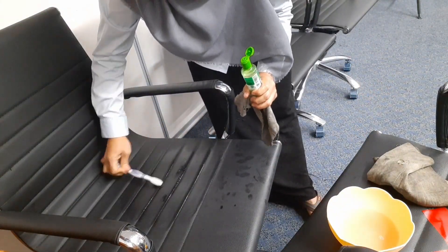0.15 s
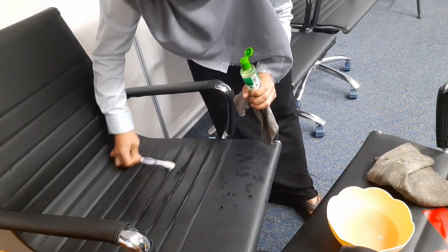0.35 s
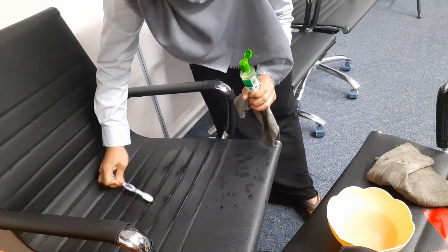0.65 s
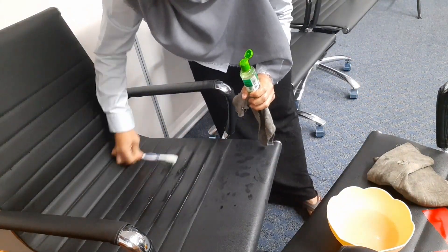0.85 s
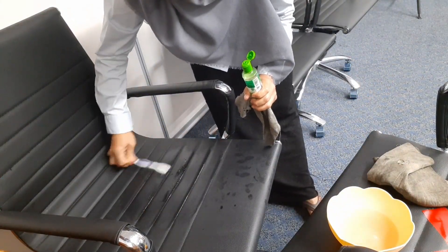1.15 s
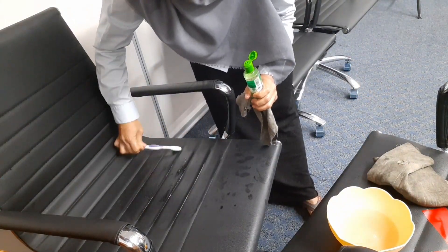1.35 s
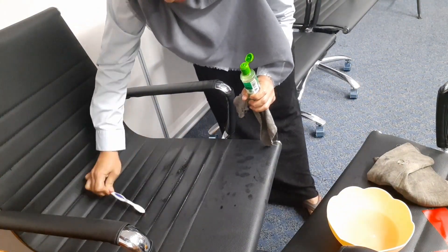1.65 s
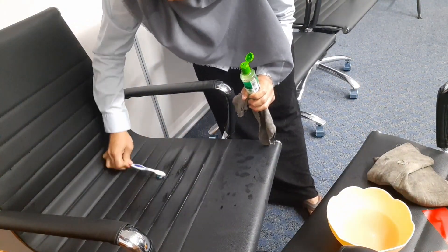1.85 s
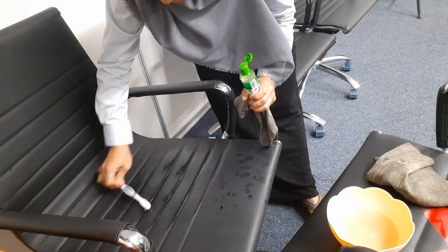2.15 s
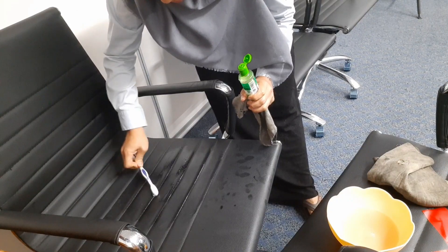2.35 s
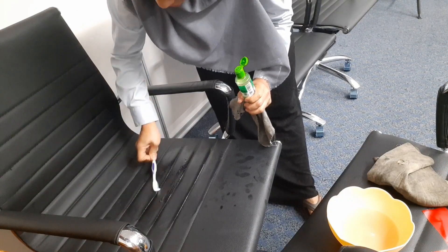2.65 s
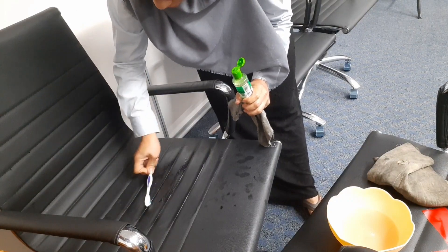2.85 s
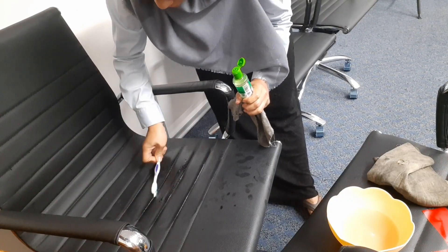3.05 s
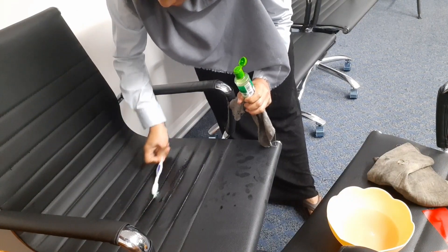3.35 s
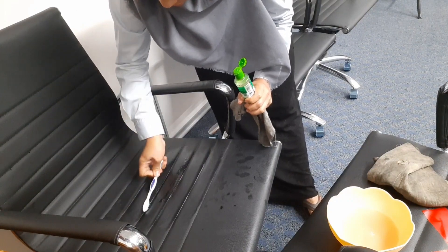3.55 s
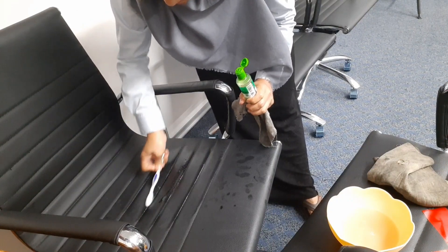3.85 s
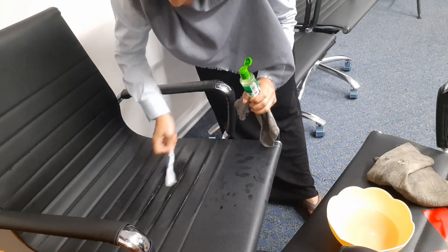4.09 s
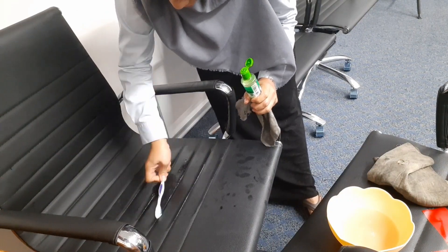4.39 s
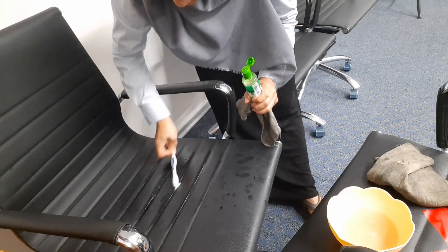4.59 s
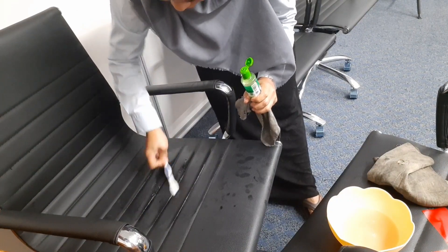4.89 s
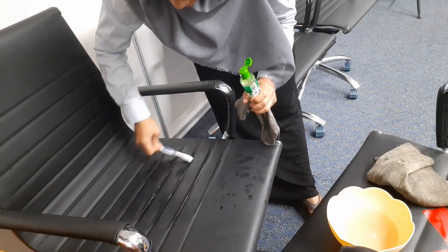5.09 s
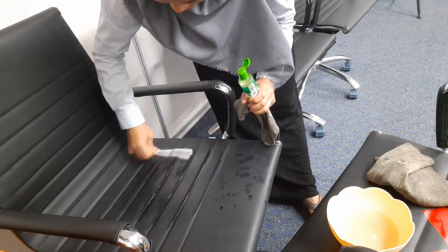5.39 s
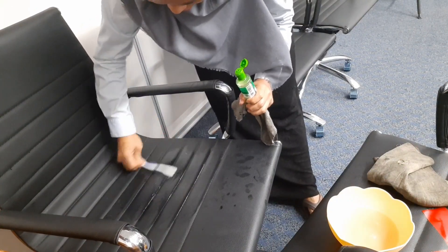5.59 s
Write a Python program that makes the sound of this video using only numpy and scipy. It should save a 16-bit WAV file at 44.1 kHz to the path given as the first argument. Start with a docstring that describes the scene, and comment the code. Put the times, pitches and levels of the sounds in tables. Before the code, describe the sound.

Quick, even toothbrush strokes fizz and swish over wet leather close by, while the padded seat gives dull bumps in a quiet office.

```python
"""A toothbrush scrubs a wet leather chair seat in a carpeted office, about five strokes a second.
From the start, bristles fizz, the wet film swishes and the leather judders over a faint room rumble.
Near 2.5 s the swish rings lower and the padded seat booms more often as the hand pushes into it.
After 4 s the swish climbs again and the booms peak; just before the end the brush lands with its
sharpest tick. A phone close by hears it all, with short reflections off the chair and the room."""
import sys
import numpy as np
from scipy import signal
from scipy.fft import rfft, irfft, next_fast_len
from scipy.io import wavfile
from scipy.ndimage import uniform_filter1d

SR = 44100
rng = np.random.default_rng(int(sys.argv[2]) if len(sys.argv) > 2 else 0)


def dump(signal):
    """Clip the signal to [-1, 1] and save it as 16-bit WAV at the path in sys.argv[1]."""
    limited = np.clip(np.atleast_2d(signal).T, -1, 1)
    pcm = np.round(limited * 32767).astype(np.int16)
    wavfile.write(sys.argv[1], SR, pcm)


N = 252693
T = np.arange(N) / SR
SIZE = next_fast_len(N + SR // 4)  # leaves space for the room's tail
F = np.fft.rfftfreq(SIZE, 1 / SR)

# strokes, to and fro: start t/s, length/s, fastest point and hardest drag (both 0-1 of the stroke),
# then a relative level/dB each for bristles, swish, leather and frame
BRUSH_STROKES = [(-0.072, 0.21, 0.13, 0.14, -47, -53.5, -63.5, -61.5),
                 (0.155, 0.11, 0.27, 0.3, -57, -73, -75.5, -72),
                 (0.319, 0.19, 0.27, 0.32, -45, -52.5, -55.0, -58),
                 (0.492, 0.23, 0.58, 0.4, -48, -56.5, -71.5, -69),
                 (0.744, 0.24, 0.55, 0.43, -44.0, -52, -59.5, -61.5),
                 (0.997, 0.15, 0.76, 0.71, -49, -58, -83, -80),
                 (1.172, 0.17, 0.49, 0.43, -46, -53.5, -62.5, -63),
                 (1.382, 0.3, 0.57, 0.66, -44, -51.5, -73, -72),
                 (1.71, 0.24, 0.51, 0.83, -47.5, -55, -67.5, -61.5),
                 (1.95, 0.21, 0.54, 0.61, -47.5, -58.5, -66, -67.5),
                 (2.204, 0.18, 0.45, 0.47, -52.5, -59, -67, -64.5),
                 (2.374, 0.15, 0.49, 0.15, -58, -69, -70.5, -58.5),
                 (2.533, 0.179, 0.63, 0.64, -51.5, -57.5, -54.5, -58),
                 (2.695, 0.21, 0.55, 0.34, -57.0, -71, -67, -64),
                 (2.903, 0.17, 0.71, 0.86, -50.5, -60.5, -57.5, -57.5),
                 (3.063, 0.19, 0.58, 0.54, -52, -66, -65.0, -60),
                 (3.273, 0.17, 0.55, 0.64, -53.5, -61.5, -60.5, -63),
                 (3.403, 0.22, 0.53, 0.53, -53, -60, -60.5, -64),
                 (3.614, 0.17, 0.77, 0.68, -47, -55.5, -56.5, -56.5),
                 (3.774, 0.213, 0.38, 0.44, -51.5, -62.5, -62, -57.5),
                 (3.968, 0.16, 0.67, 0.62, -49.5, -60.5, -61.5, -63),
                 (4.205, 0.23, 0.6, 0.68, -53.5, -63, -65.5, -63.5),
                 (4.451, 0.21, 0.68, 0.54, -44.5, -51.0, -51.5, -55),
                 (4.656, 0.19, 0.48, 0.21, -48.5, -58.0, -59.5, -57.5),
                 (4.836, 0.266, 0.59, 0.48, -43, -49, -53.0, -53),
                 (5.126, 0.12, 0.53, 0.6, -49.5, -61.5, -71.5, -63),
                 (5.238, 0.19, 0.45, 0.4, -47.5, -58, -69.5, -65),
                 (5.422, 0.18, 0.38, 0.48, -45.5, -53.0, -64, -55),
                 (5.589, 0.185, 0.46, 0.74, -45.5, -53, -61.5, -61.5)]
# tone of the flicking bristles: f/Hz, level/dB
BRISTLE_TONE = [(1500, -22), (3000, -17.5), (4200, -13), (6200, -4.5), (7000, -3), (7900, -2), (8600, 2),
                (10000, 0), (12200, -0.5), (14000, -2.5), (15800, -6.5)]
# tone of the wet film: f/Hz, level/dB
SWISH_TONE = [(600, -10.5), (950, -23), (1200, -6), (1650, 0), (2100, -3), (2700, -1), (3250, -3),
              (4000, -0.5), (6000, -6), (10000, -24)]
# the hollow under the brush rings high across the seat's ribs, low along them: t/s, f/Hz
HOLLOW_PITCH = [(0, 1560), (2.35, 1586), (2.5, 1047), (4.1, 1073), (4.8, 1421), (5.3, 1720), (5.73, 1727)]
# tone of the brush head dragging on leather: f/Hz, level/dB
DRAG_TONE = [(90, -5), (170, -2), (270, -2), (400, -2), (560, -4.5), (720, -5.5), (1000, -10.5),
             (1400, -11), (2500, -28)]
# ringing notes of the stretched leather cover: f/Hz, width/Hz, level/dB
COVER_NOTES = [(334, 11, -1), (368.7, 24, -1.5), (439.5, 87, -9.5), (526, 23.6, -3), (609.4, 62, -15.5)]
# ringing notes of the seat's frame: f/Hz, width/Hz, level/dB
FRAME_NOTES = [(169, 47, -7.5), (204.3, 19, -0.5), (235, 22.5, -3), (264.7, 26.3, -4.5)]
# ringing notes of the cushion: f/Hz, width/Hz, level/dB
CUSHION_NOTES = [(55, 40, -22), (96.09, 6.25, 2.5), (119.1, 13.4, -7)]
# the arm's weight keeps the cushion rumbling: t/s, relative level/dB
ARM_WEIGHT = [(0, -67.5), (2.3, -65), (3, -56.5), (4.3, -50.5), (5.73, -57.5)]
# echoes off hand, armrest and backrest: delay/s, change of delay over a stroke/s, level/dB
CLOSE_ECHOES = [(.00045, .0001, -9.5), (.0014, 0.0044, -13), (.0032, 0.0046, -8.5), (.0061, -0.0037, -9)]
# tone of the ventilation: f/Hz, level/dB
VENT_TONE = [(25, -22), (60, 16.5), (80, -7.5), (130, 4.5), (200, 4), (270, -6.5), (400, -23), (800, -21.5),
             (2000, -25.5), (6000, -30.5), (15000, -23)]
# the brush lands or flips its bristles over: t/s, relative tick level/dB, relative thump level/dB
BRUSH_LANDINGS = [(0.156, -59, -80), (0.326, -54.5, -60), (0.518, -56, -72), (0.775, -47, -62),
                  (1.037, -55, -73), (1.196, -49, -70), (1.737, -70, -70), (1.99, -59, -65),
                  (2.57, -65.5, -66), (3.843, -58, -62), (5.448, -41.5, -43)]
# the frame groans as a stroke loads it: peak t/s, length/s, level/dB
FRAME_GROANS = [(.355, 0.042, -52), (.87, .06, -58), (1.92, 0.072, -59), (3.41, 0.037, -52),
                (4.52, .06, -51)]
# the seat gives under a push and booms: peak t/s, length/s, relative level/dB
SEAT_PUSHES = [(0.38, 0.13, -51), (0.859, 0.16, -55), (2.43, 0.072, -53.5), (2.606, 0.13, -51),
               (2.8, 0.07, -56), (2.922, 0.13, -48.5), (3.042, 0.18, -46), (3.38, 0.12, -48),
               (3.551, 0.094, -47), (3.7, 0.11, -47.5), (3.77, 0.13, -43), (3.868, 0.05, -43.5),
               (4.076, 0.092, -49), (4.191, 0.08, -46.5), (4.302, 0.11, -39.5), (4.412, 0.058, -40.5),
               (4.654, 0.17, -45.5), (4.728, 0.13, -45), (4.88, 0.15, -45), (5.055, 0.12, -45),
               (5.193, 0.05, -45), (5.333, 0.05, -51), (5.467, 0.05, -49), (5.539, 0.13, -49.5),
               (5.69, 0.079, -44)]
# the brush digs in and the hollow rings out: peak t/s, length/s, level/dB
BRUSH_DIGS = [(2.09, 0.11, -57.5), (2.66, 0.071, -54), (3.04, 0.061, -63), (3.37, 0.11, -62.5),
              (4.08, 0.11, -61.5), (4.6, .12, -57.5)]


def undb(db):
    """Turn decibels into a number to multiply by."""
    return np.exp(np.asarray(db) * (np.log(10) / 20))


def unit(x):
    """Scale a signal to an average power of 1."""
    return x / np.sqrt(np.mean(x ** 2))


def curve(rows):
    """Join (time, value) points with straight lines."""
    return np.interp(T, *np.transpose(rows))


def colour(x, tone):
    """Make the lows and highs of x stronger or weaker, following a tone table."""
    hz, db = np.transpose(tone)
    gain = undb(np.interp(np.log(F + 1), np.log(hz), db))
    return unit(irfft(rfft(x, SIZE) * gain, SIZE)[:N])


def resonate(x, notes):
    """Let x ring a set of notes, added with alternating signs; narrow notes ring longer."""
    return unit(sum((-1) ** k * undb(db) * signal.lfilter(*signal.iirpeak(hz, hz / width, fs=SR), x)
                    for k, (hz, width, db) in enumerate(notes)))


def glide(x, hz, width_hz):
    """Each click of x rings briefly at a pitch that can move."""
    ring = signal.sosfilt(signal.butter(2, width_hz / 2, fs=SR, output="sos"), x)
    return unit(ring * np.cos(2 * np.pi * np.cumsum(hz) / SR))


def wander(rate):
    """A random drift that takes a new direction rate times a second."""
    points = rng.standard_normal(N // 10)
    return unit(np.interp(T * rate, np.arange(len(points)), points))


def slips(rate, spread_db):
    """Tiny random clicks of uneven size as something lets go, about rate a second."""
    share = np.clip(rate / SR, 1e-4, 1)
    chance = rng.uniform(-1, 1, N)
    size = undb(spread_db * rng.standard_normal(N)) * np.sign(chance)
    return unit((np.abs(chance) < share) * size / np.sqrt(share))  # equally strong at any rate


def steady(x, span_s):
    """Even out random swells slower than span_s, as under a firm hand."""
    return x / np.sqrt(uniform_filter1d(x * x, int(span_s * SR)) + 1e-4)


def stroke_level(peaks, levels_db, steepness, rest_db):
    """Level in dB that rises and falls with each stroke; rest_db still rubs as the brush turns round."""
    power = np.ones(N) * undb(rest_db) ** 2
    for (start, length, *_), peak, db in zip(BRUSH_STROKES, peaks, levels_db):
        span = slice(*np.searchsorted(T, [start, start + length]))
        progress = np.clip((T[span] - start) / length, 0, 1)
        arch = (progress / peak) ** peak * ((1 - progress) / (1 - peak)) ** (1 - peak)
        power[span] += (undb(db) * arch ** steepness) ** 2
    return 10 * np.log10(power)


def swells(rows, base_db):
    """Level in dB of bell-shaped swells on top of a base level."""
    power = np.ones(N) * undb(base_db) ** 2
    for s, length, db in rows:
        span = slice(*np.searchsorted(T, [s - length, s + length]))
        bell = np.exp(-8 * ((T[span] - s) / length) ** 2)
        power[span] += (undb(db) * bell) ** 2
    return 10 * np.log10(power)


def bristles(level_db, speed, lightness):
    """Bristles flick free, more of them on a fast stroke; a light hand brings out the bright tips."""
    flicks = slips(4000 + 24000 * speed, spread_db=0.5)
    tips = glide(flicks, np.full(N, 12300.), width_hz=5800)
    share = undb(-1.5) * lightness
    fizz = (colour(flicks, BRISTLE_TONE) + share * tips) / np.sqrt(1 + share ** 2)
    return fizz * undb(level_db + 3.0)


def wet_film(level_db, ring_db, speed):
    """The bristles wipe through the film of cleaner, which rings the hollow under the brush."""
    hollow = glide(slips(900 + 4000 * speed, spread_db=3), curve(HOLLOW_PITCH), width_hz=750)
    film = colour(slips(1500 + 7000 * speed, spread_db=2), SWISH_TONE)
    return film * undb(level_db + 0.28) + hollow * undb(ring_db)


def leather(level_db, speed):
    """The brush head sticks and slips: the cover rings, and its grain rasps higher at speed."""
    judder = colour(slips(1000, spread_db=-0.5), DRAG_TONE)
    ring = resonate(slips(600, spread_db=4.0), COVER_NOTES)
    rasp = glide(slips(700, spread_db=2.0), 120 + 1400 * speed, width_hz=550)
    rub = unit(judder + undb(2) * ring + undb(-1.0) * speed * rasp)
    return steady(rub, span_s=0.073) * undb(level_db - 0.1)


def seat(level_db, notes, span_s):
    """The rubbing shakes a part of the seat, frame or cushion, so that it rings."""
    ring = resonate(slips(1500, spread_db=2.5), notes)
    return steady(ring, span_s) * undb(level_db)


def brush_place():
    """The brush goes to and fro while the hand wanders over the seat."""
    turns = [start for start, *_ in BRUSH_STROKES] + [T[-1]]
    strokes_done = np.interp(T, turns, np.arange(len(turns)))
    return np.cos(np.pi * strokes_done) / 2 + wander(1.5)


def chair_echoes(x, place):
    """Close echoes boost some pitches and cancel others; the pattern slides as the brush moves."""
    return x + sum(undb(db) * np.interp(T - delay - swing * place, T, x)
                   for delay, swing, db in CLOSE_ECHOES)


def office(direct, scattered, room_db, bass_hz, tail_db, fade_s):
    """Two microphones, the right a little nearer; each gets its own scatter and a short, weak tail."""
    age = T[:SR // 4]
    early, late = undb(-60 * age / fade_s), undb(-25 - 60 * age / .35)
    tail = rng.standard_normal((2, len(age))) * (early + late)
    tail *= undb(tail_db) / np.linalg.norm(tail, axis=1, keepdims=True)
    lag_s = np.array([[6.4e-5], [0]])
    near = rfft(direct, SIZE) * np.exp(-2j * np.pi * F * lag_s)
    far = rfft(scattered, SIZE) + near * rfft(tail, SIZE)
    share = undb(room_db) * F / np.hypot(F, bass_hz)  # low notes reach both microphones alike
    return irfft((near + share * far) / np.sqrt(1 + share ** 2), SIZE)[:, :N]


def ventilation(level_db, side_db):
    """The ventilation rumbles faintly, nearly the same left and right."""
    middle, side = (colour(rng.standard_normal(N), VENT_TONE) for _ in range(2))
    return undb(level_db) * (middle + undb(side_db) * side * np.array([[1], [-1]]))


def sticking(length_s, depth_db):
    """Dip in dB before each landing: the bent bristles stick and hush until they flip over."""
    dip = np.zeros(N)
    for s, *_ in BRUSH_LANDINGS:
        span = slice(*np.searchsorted(T, [s - length_s, s]))
        dip[span] = depth_db * np.linspace(0, 1, len(T[span])) ** .5
    return dip


def landings(tick_s, thump_s):
    """Each landing slaps many bristles down (a loudness curve) and jolts the seat (a sound wave)."""
    slap, jolt = np.zeros(N), np.zeros(N)
    age = T[:SR // 5]
    ring = sum(undb(db) * np.sin(2 * np.pi * hz * age) for hz, _, db in CUSHION_NOTES + FRAME_NOTES)
    thump = np.exp(-age / thump_s) * ring / 2
    for s, tick_db, thump_db in BRUSH_LANDINGS:
        span = slice(int(s * SR), int(s * SR) + len(age))
        slap[span] += undb(tick_db) * np.exp(-age / tick_s)
        jolt[span] += undb(thump_db) * thump
    return slap, jolt


def scene():
    """Each stroke drives bristles, wet film and leather and shakes the chair in the office."""
    _, _, fast_at, drag_at, bristle, swish, drag, frame = np.transpose(BRUSH_STROKES)
    lean_db = curve(ARM_WEIGHT)
    grip_db = wander(40) + sticking(length_s=.04, depth_db=-8.5)  # the hand presses unevenly
    bristle_db = stroke_level(fast_at, bristle - 3.7, steepness=3.0, rest_db=-82.5) + grip_db
    swish_db = stroke_level(fast_at, swish - 3.5, steepness=3.45, rest_db=-87) + grip_db
    drag_db = stroke_level(drag_at, drag + 2.38, steepness=2, rest_db=-78.5) + grip_db
    shake_db = stroke_level(drag_at, frame + 0.75, steepness=1.2, rest_db=lean_db - 8)
    frame_db = swells(FRAME_GROANS, base_db=shake_db)
    ring_db = swells(BRUSH_DIGS, base_db=swish_db - 7.0)
    cushion_db = swells(SEAT_PUSHES, base_db=lean_db) - .3
    place = brush_place()
    speed = undb((bristle_db - bristle_db.max()) / 2)  # 1 at the fastest moment
    lightness = np.clip((bristle_db - drag_db - 4.0) / 14, 0, 1)  # much hiss with little drag
    tufts = undb(0.87 * wander(220))  # whole tufts catch and let go
    slap, jolt = landings(tick_s=0.0017, thump_s=0.048)

    def scrub():
        """The sound sent in one direction; the many bristles and broad seat make each one different."""
        hiss = tufts * (bristles(bristle_db, speed, lightness) + wet_film(swish_db, ring_db, speed))
        groan = seat(frame_db, FRAME_NOTES, span_s=0.045)
        ticks = slap * rng.standard_normal(N)
        return chair_echoes(hiss + ticks, place) + leather(drag_db, speed) + groan

    direct = scrub() + jolt
    scattered = np.array([scrub(), scrub()])
    heard = office(direct, scattered, room_db=2.35, bass_hz=810, tail_db=-5.0, fade_s=0.1)
    boom = seat(cushion_db, CUSHION_NOTES, span_s=0.02367)  # the cushion moves as one
    balance = undb([[0.4], [-0.4]])  # a little louder on the left
    return (heard + boom) * balance + ventilation(level_db=-67.5, side_db=-5.0)


def record(dry):
    """The phone sharply cuts off the highest treble."""
    top_hz = 15800
    return signal.sosfilt(signal.ellip(12, .1, 75, top_hz, fs=SR, output="sos"), dry)


dry = scene()
out = record(dry)
dump(out)
```